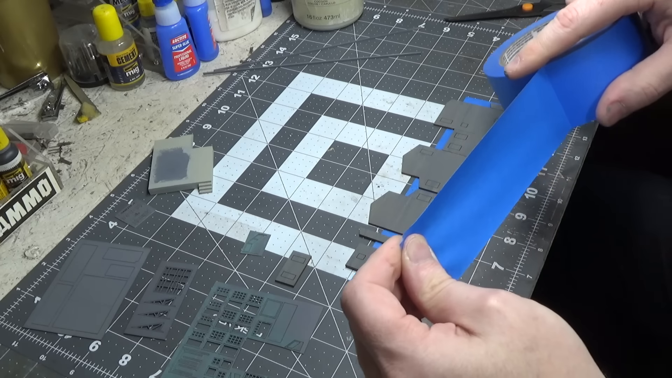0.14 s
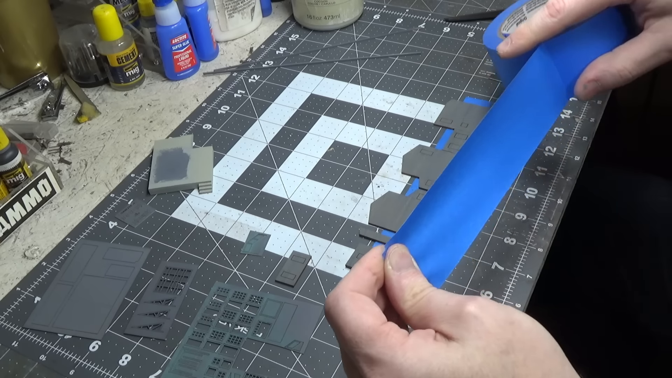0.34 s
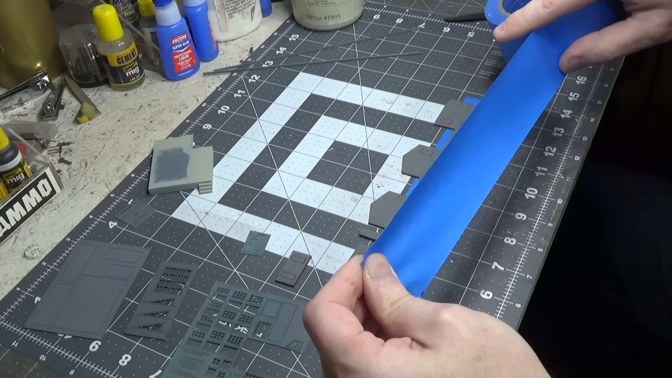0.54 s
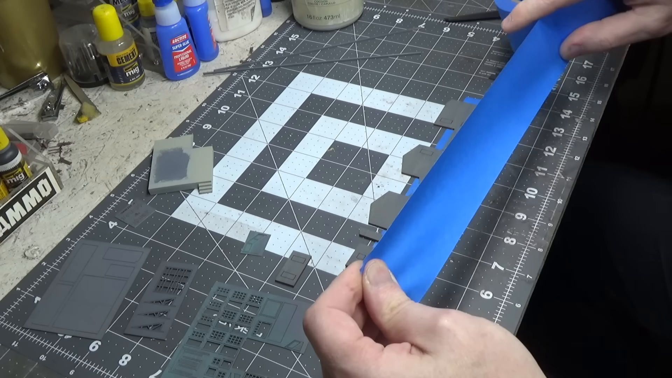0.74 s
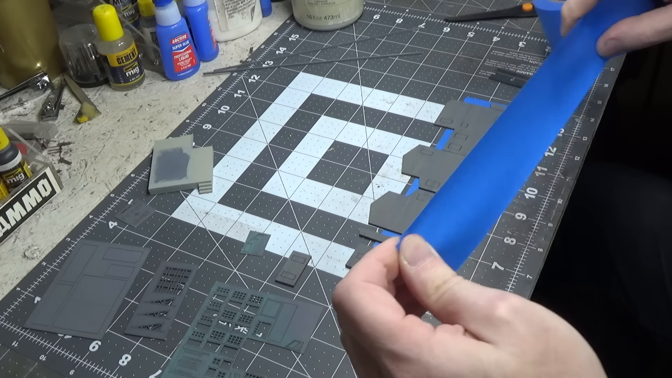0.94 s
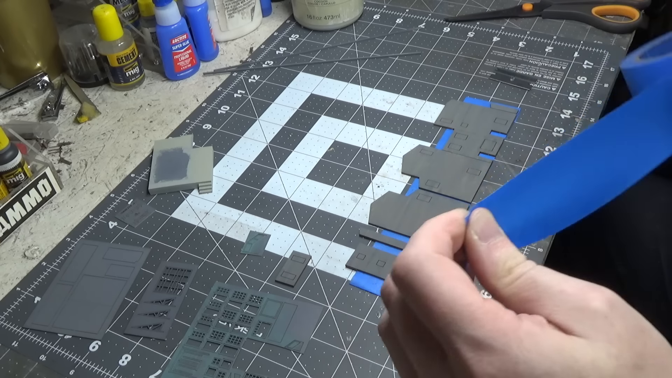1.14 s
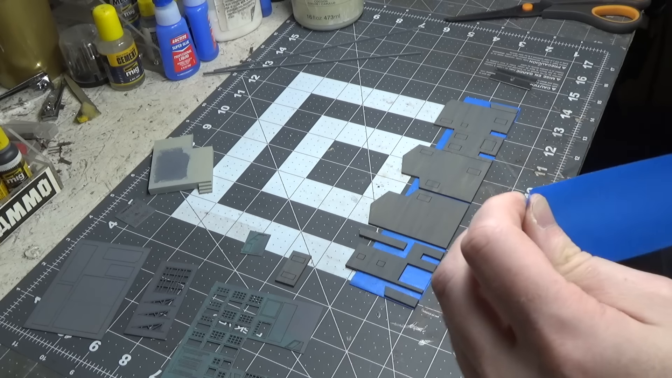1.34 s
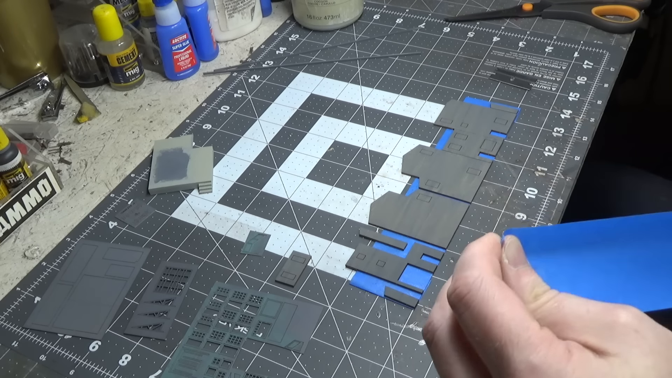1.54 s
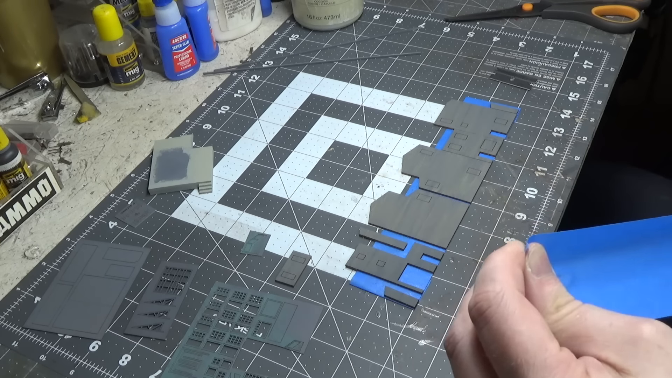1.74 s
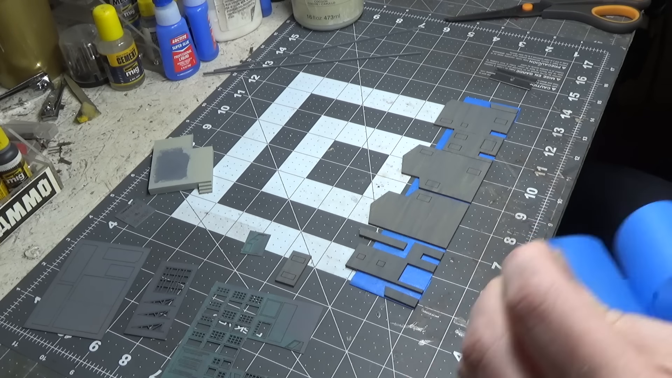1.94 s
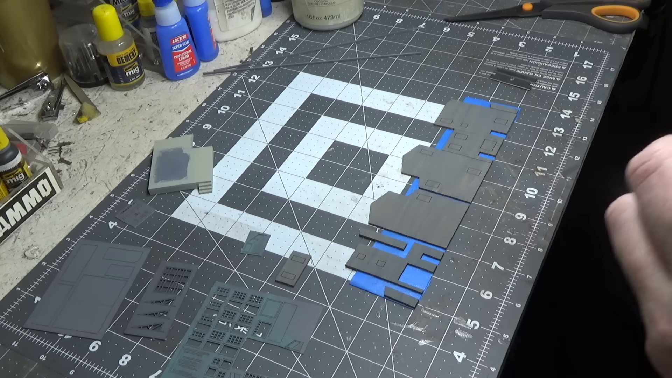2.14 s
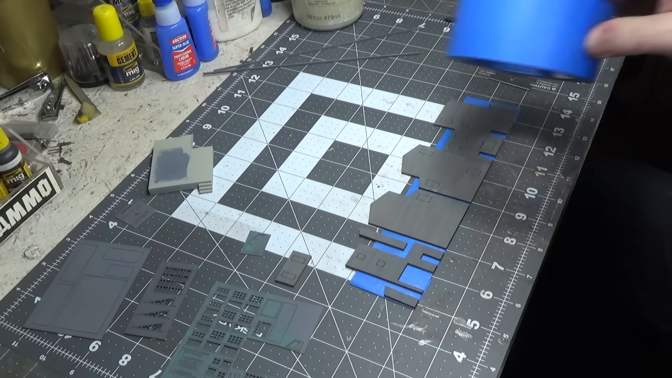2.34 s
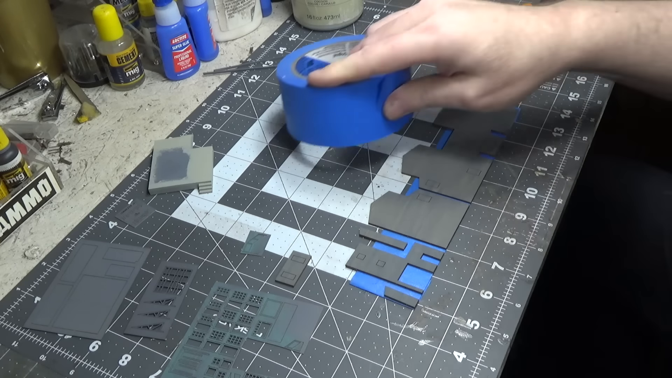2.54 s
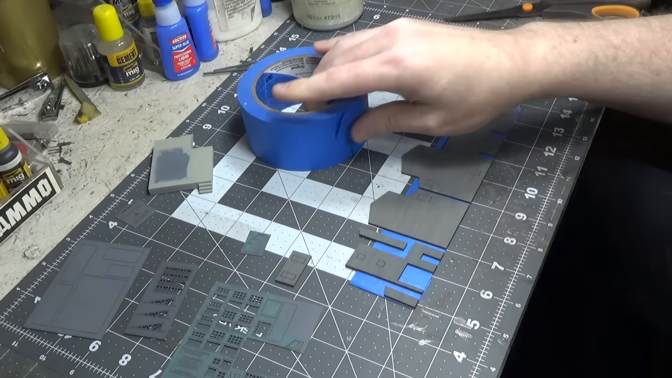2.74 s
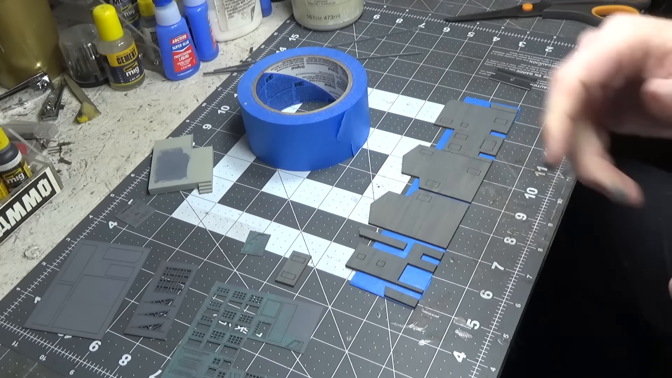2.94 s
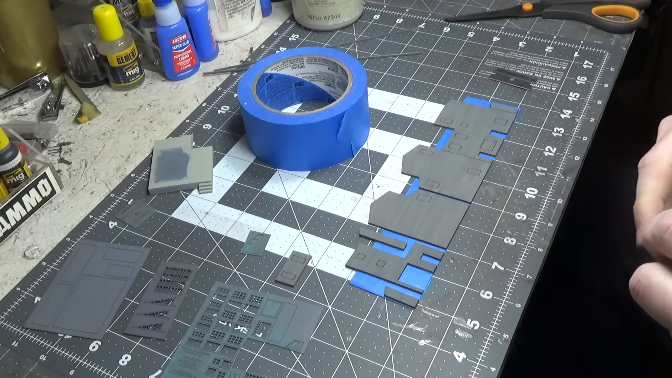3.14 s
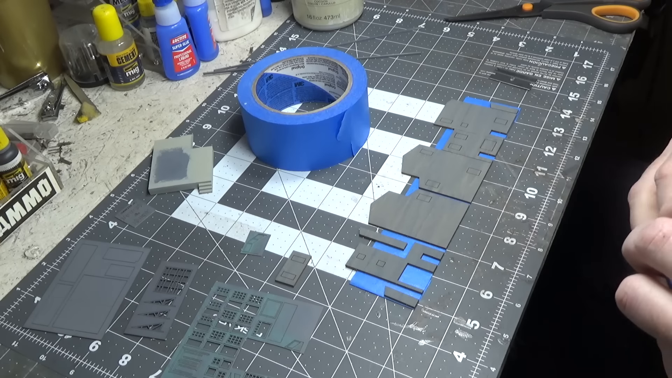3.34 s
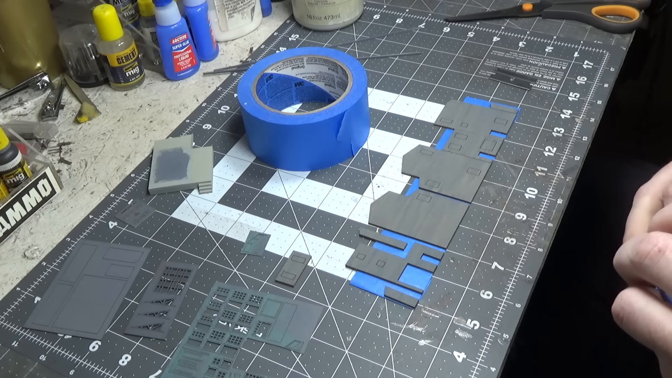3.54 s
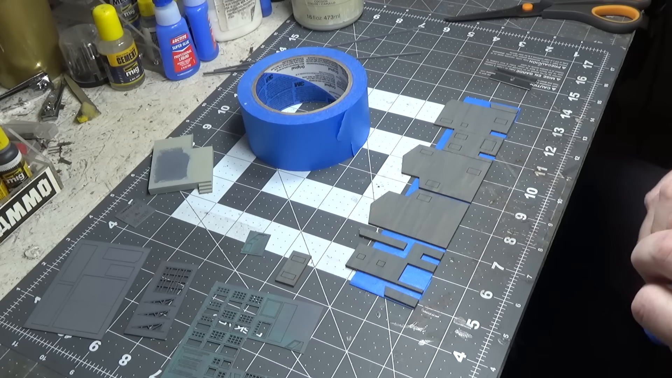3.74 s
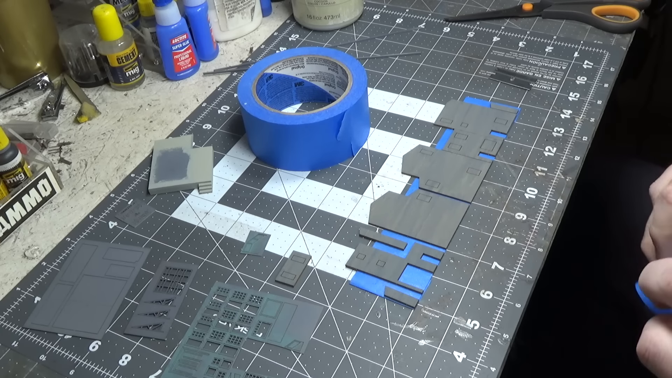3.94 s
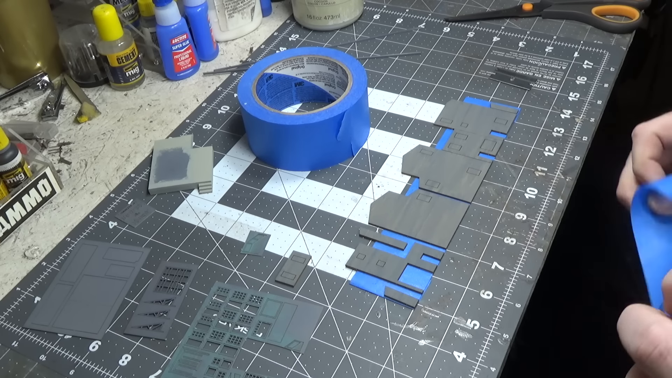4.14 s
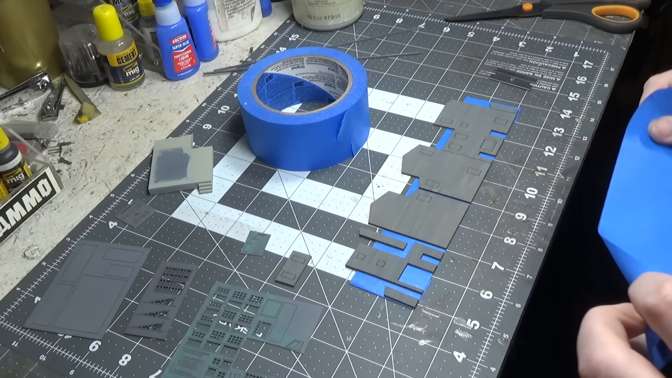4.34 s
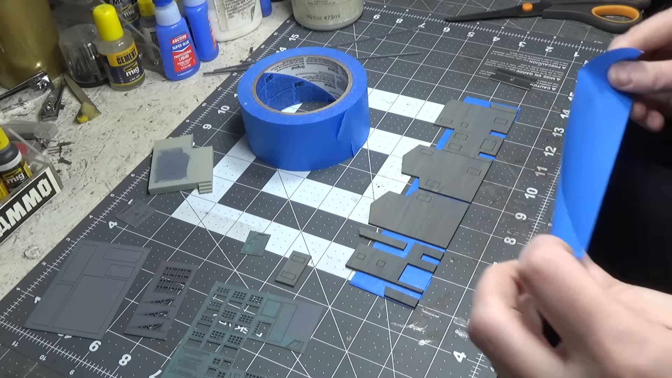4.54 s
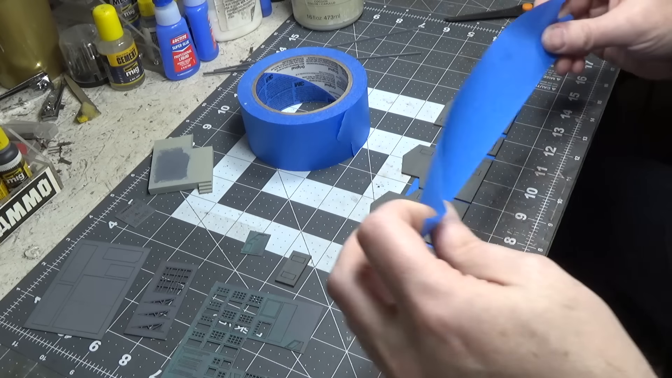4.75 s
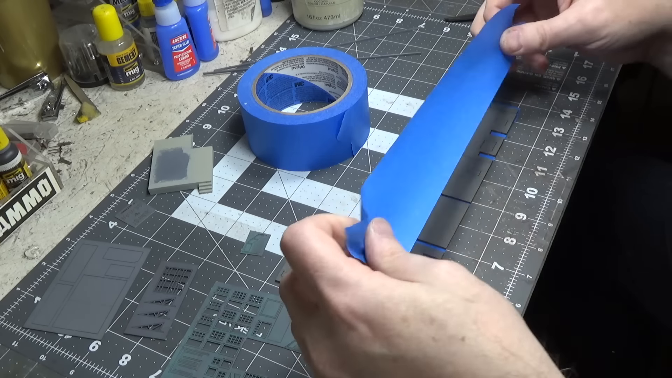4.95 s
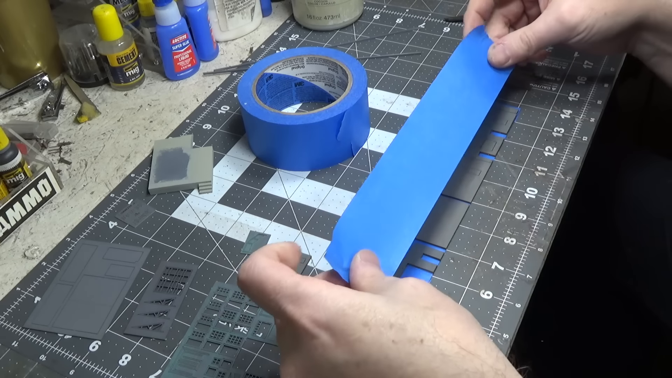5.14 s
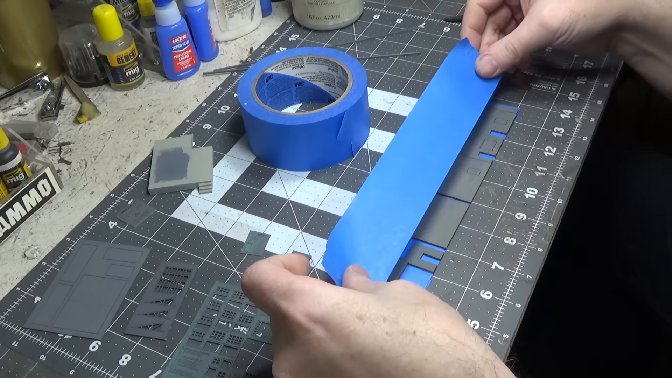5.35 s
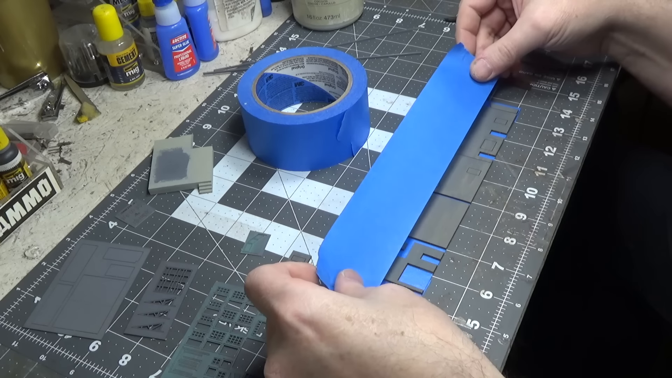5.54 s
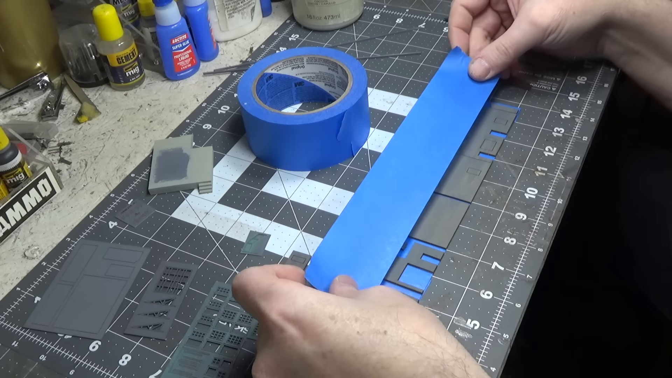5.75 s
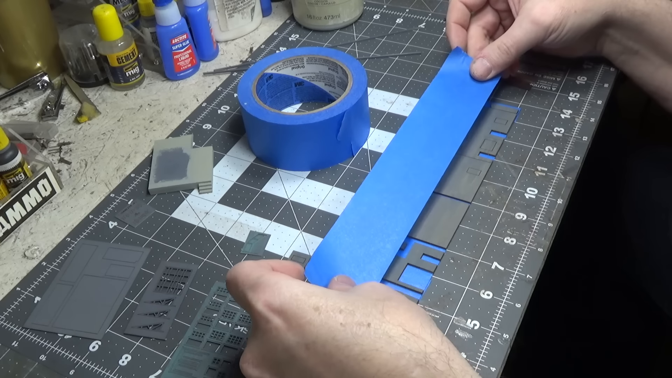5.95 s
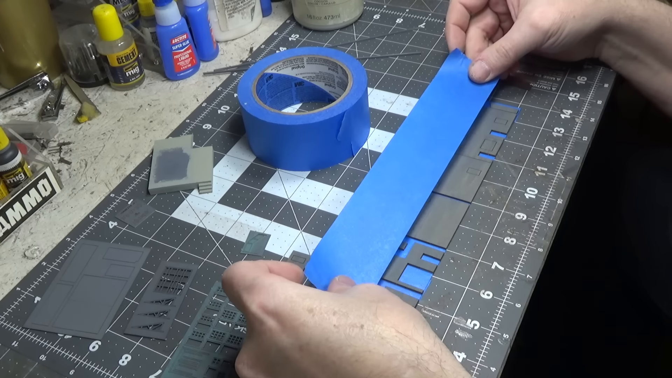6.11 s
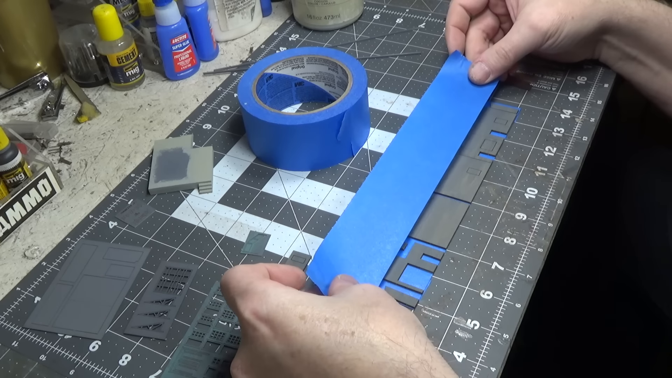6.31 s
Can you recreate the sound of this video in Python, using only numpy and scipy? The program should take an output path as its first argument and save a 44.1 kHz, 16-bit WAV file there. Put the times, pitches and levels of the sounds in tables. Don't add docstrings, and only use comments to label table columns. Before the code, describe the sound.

Close-up of masking tape being unrolled and ripped loose, the roll knocked onto a desk, and the strip crinkled and smoothed by fingers in a quiet room.

```python
import sys
import numpy as np
from scipy import signal
from scipy.fft import rfft, irfft
from scipy.io import wavfile
from scipy.ndimage import uniform_filter1d, map_coordinates

SR = 44100
rng = np.random.default_rng(int(sys.argv[2]) if len(sys.argv) > 2 else 0)


def int16_out(signal):
    q = np.round(np.clip(np.atleast_2d(signal).T, -1, 1) * 32767)
    wavfile.write(sys.argv[1], SR, q.astype(np.int16))


def boost(x):
    u = np.asarray(x, float) / 20
    return 10 ** u


N = 281269
T = np.arange(N) / SR


def unit(x):
    return x / np.sqrt(np.mean(x ** 2) + 1e-20)


def noise():
    return rng.standard_normal(N)


def add_at(out, s, sound):
    out[round(s * SR):][:len(sound)] += sound


def along(points, hz):
    f, v = np.transpose(points)
    return np.interp(np.log(hz + 1), np.log(f + 1), v)


def curves(rows):
    s, first, *rest = np.transpose(rows)
    return [np.interp(T, s, first, -200, -200)] + [np.interp(T, s, column) for column in rest]


def wobble(rate):
    return map_coordinates(rng.standard_normal(int(N * rate / SR) + 4), [T * rate])


def colour(x, gain):
    size = 8192
    g = gain(np.fft.rfftfreq(size, 1 / SR)) + 1e-5
    cepstrum = irfft(np.log(unit(g)))
    cepstrum[1:size // 2] *= 2
    cepstrum[size // 2 + 1:] = 0
    return signal.fftconvolve(x, irfft(np.exp(rfft(cepstrum))))[:N]


def tint(x, points):
    return colour(x, lambda hz: boost(along(points, hz)))


def gliding(force, hz, width_hz):
    turn = np.exp(2j * np.pi * np.cumsum(hz) / SR)
    pole = np.exp(-1.5 * np.pi * width_hz / SR)
    smooth = signal.lfilter([1], [1, -2 * pole, pole ** 2], force / turn)
    return unit((turn * smooth).real)


def grit(spike_db, share):
    clicks = (rng.random(N) < share) * boost(spike_db * rng.random(N))
    return unit(noise() * (1 + clicks))


def patchy(x, depth_db):
    z = signal.stft(x, nperseg=256)[2]
    field = uniform_filter1d(rng.standard_normal(z.shape), size=7, axis=0)
    field = uniform_filter1d(field, size=14, axis=1)
    return unit(signal.istft(z * boost(depth_db * unit(field)), nperseg=256)[1][:N])


# frequency in Hz, level in dB.
MICROPHONE_COLOUR = [(530, -54.5), (900, -15.5), (1020, -11), (1150, -9.5), (1220, -8.5), (2020, -5), (2300, -6),
                     (3000, -1.5), (3910, -11), (5410, -4.5), (6970, -8), (8980, -6), (11100, -13.5),
                     (14900, -21.5), (16000, -27)]
# frequency in Hz, level in dB.
KNOCK_COLOUR = [(80, -26), (200, -2.5), (450, -1), (900, 0), (1600, -13.5), (4000, -41)]


def paper(dull, sharp, knock):
    split_hz = 3900
    upper = lambda hz: 1 / (1 + (split_hz / (hz + 1)) ** 12)
    low = colour(dull, lambda hz: boost(along(MICROPHONE_COLOUR, hz)) * np.sqrt(1 - upper(hz)))
    high = colour(sharp, lambda hz: boost(along(MICROPHONE_COLOUR, hz)) * np.sqrt(upper(hz)))
    return low + high + tint(knock, KNOCK_COLOUR)


def bursts(rows):
    force = np.zeros((3, N + SR))
    t = np.arange(SR // 4) / SR
    for s, db, knock_db, sharp_db, t60, rise in rows:
        life = max(t60, .003) * np.array([[1], [.7], [1.3]])
        swell = np.minimum(t / max(rise, 1e-4), 1)
        shape = swell * boost(-60 * np.maximum(t - rise, 0) / life)
        size = boost(np.array([[db], [db + sharp_db], [db + knock_db]]))
        hiss = rng.standard_normal((3, len(t)))
        if rise == 0:
            hiss[:2] *= np.clip(t60 / .018, .2, 1)
            hiss[:2, 0] = 6.2
        muffled = np.clip(-sharp_db / 10, 0, 1)
        smooth = uniform_filter1d(uniform_filter1d(hiss[1], size=5), size=3)
        hiss[1] += muffled * (3.6 * smooth - hiss[1])
        force[:, round(s * SR):][:, :len(t)] += size * shape * hiss
    return paper(*force[:, :N])


# time in seconds, pull in dB, the free strip's lowest
# pitch in Hz, overtone in Hz.
PEELING = [
    (0.0, -42.5, 230.6, 760),
    (0.112, -39.5, 238.3, 790),
    (0.19, -43, 238.3, 790),
    (0.266, -44.5, 202.3, 846),
    (0.385, -43, 191.6, 795),
    (0.46, -43.5, 171.3, 740),
    (0.55, -43.5, 149, 633),
    (0.662, -46.5, 121.1, 591),
    (0.82, -51.5, 116.4, 580),
    (0.93, -73.5, 98.3, 874),
]


def peel():
    short_hz = 240
    hiss_db, drum_hz, over_hz = curves(PEELING)
    sunk = np.log2(short_hz / drum_hz)
    short = np.clip(drum_hz / short_hz, .1, 1) ** 2
    eased_db = 10 * np.exp(-((T - 0.83) / 0.12) ** 2)
    drum_db = hiss_db + 2.5 - 6 * sunk + eased_db
    over_db = hiss_db + 6 - 18 * sunk ** 4
    bright_db = -8 + 8.5 * sunk
    slips = boost(1.33 * wobble(220) + 0.63 * wobble(27.0))
    shaken = lambda: slips * noise()
    hiss = boost(hiss_db) * patchy(slips * grit(12, .004), depth_db=2)

    swing = np.sin(2 * np.pi * np.cumsum(drum_hz * (1 + 0.05 * short * wobble(45.4))) / SR)
    drum = boost(1.5) * swing * boost((0.5 + 2.6 * short) * wobble(30.4))
    drum = drum + boost(-1.0) * short * gliding(shaken(), 1.12 * drum_hz, width_hz=65)
    second = boost(-9.5 + 2.2 * wobble(24.6)) * gliding(shaken(), 2.0 * drum_hz, width_hz=86)
    under = boost(-0.5) * short * gliding(shaken(), 0.754 * drum_hz, width_hz=39)

    longer = np.minimum(sunk, .7)
    fine = noise() * boost(hiss_db - 29 + 32 * longer)
    fizz = colour(fine, lambda hz: np.exp(-((hz - 12500) / 3500) ** 2))
    body_force = shaken() * boost(hiss_db - 6.5 + 6.5 * longer)
    body = colour(body_force, lambda hz: np.exp(-np.log(hz / 1300 + 1e-9) ** 2 / 0.53))

    port_db = hiss_db - 5.5 - 10 * sunk + 2.5 * wobble(140) + 3 * swing
    port = boost(port_db) * gliding(shaken(), np.full(N, 3120.), width_hz=480)
    over = gliding(shaken(), over_hz, width_hz=120)
    over = over + boost(-4.0) * gliding(shaken(), 1.205 * over_hz, width_hz=83)
    over = boost(over_db - 5.0 + 3.7 * wobble(44.5)) * over
    rustle = paper(hiss, hiss * boost(bright_db), hiss * boost(-2.5))
    return rustle + boost(drum_db) * (drum + second + under) + over + fizz + body + port


# time in seconds, peak in dB, sharpness in dB,
# time to die away by 60 dB in seconds, rise in seconds.
TEAR_JERKS = [(1.788, -48.5, -1, 0.062, 0.0037), (1.804, -40.5, -0.5, 0.031, .003),
              (1.8140, -32, -7, 0.05, 0.0014), (1.8172, -11.5, -1.5, 0.057, 0.0013),
              (1.8222, -17, 0.5, 0.06, 0.0011), (1.8290, -13, 4, 0.031, 0.0035),
              (1.8335, -7.5, 0, 0.011, 0.0015), (1.8370, -15.5, -2.5, 0.036, .002),
              (1.8514, -9, 8, 0.027, 0.00051), (1.8535, -8.5, 2, 0.007, 0.0027),
              (1.858, -20.5, -1.5, 0.021, 0.0025), (1.8640, -18, -1.5, 0.0082, .002),
              (1.870, -31, -0.5, 0.12, .003)]
# time in seconds, peak in dB,
# sharpness in dB, time to die away by 60 dB in seconds, rise in seconds.
UNSTICKINGS = [(1.252, -56.5, 5, 0.03, 0.015), (1.425, -51.5, -7, 0.031, 0.015),
               (2.14, -41.5, 8, 0.014, 0.015), (3.22, -45.5, 1.5, 0.086, 0.0066),
               (3.33, -52.5, -7, 0.097, 0.013), (3.528, -42.5, -2, 0.12, 0.026),
               (3.745, -43, -1.5, 0.073, 0.012), (3.758, -47, 3.5, 0.057, .014),
               (3.806, -49, 3, 0.038, 0.004), (4.100, -31, 4.5, 0.077, 0.0037),
               (4.103, -36.5, -5, 0.036, 0.0016), (4.123, -31, -2, 0.043, 0.0064),
               (4.406, -42, 8, 0.056, 0.0072), (4.594, -52, 11, 0.027, 0.019),
               (4.814, -32, -2.5, 0.084, 0.0021), (5.080, -40.5, 4, 0.058, 0.013),
               (5.14, -43, -5, 0.058, 0.012), (5.553, -53.5, -4, 0.069, 0.02)]


def rips():
    with_knock = lambda rows, knock_db: [(s, db, knock_db, *rest) for s, db, *rest in rows]
    return bursts(with_knock(TEAR_JERKS, -7) + with_knock(UNSTICKINGS, -9.5))


# time in seconds, level in dB, pitch in Hz, time
# to die away by 60 dB in seconds.
TORN_PARTS = [(1.8189, -13, 1900, .012), (1.8225, -19.5, 5200, .02), (1.83, -11, 135.3, 0.079),
              (1.8315, -7.5, 8400, 0.012), (1.833, -11, 5200, 0.025), (1.8355, -12, 5560, 0.021),
              (1.8665, -21.5, 7000, .015), (1.862, -20, 8100, .015), (1.8663, -19, 3800, 0.0402),
              (1.8371, -17.5, 3260, 0.039), (1.838, -19, 607, .05), (1.835, -15.5, 414.6, .05),
              (1.828, -24, 42, .2), (1.852, -9, 8600, .014), (1.8522, -8.5, 9900, 0.013),
              (1.8525, -11, 5600, 0.01), (1.855, -12, 2490, 0.019), (1.855, -15.5, 5400, .012)]
# time in seconds, level in dB, pitch in
# Hz, time to die away by 60 dB in seconds.
KNOCKED_PARTS = [(1.627, -50, 5200, .03), (1.618, -34, 430, 0.059), (1.618, -34.5, 240, 0.054),
                 (2.640, -26, 100.6, 0.066), (2.640, -37.5, 295, 0.11), (2.708, -44, 530, .08),
                 (2.6395, -35.5, 694, 0.038), (2.640, -25, 2340, 0.016), (2.640, -28, 3200, 0.018),
                 (2.778, -21.5, 419, .08), (2.779, -29, 508, 0.15), (2.777, -30.5, 1050, 0.052),
                 (2.778, -25, 3100, 0.033), (2.779, -20, 2170, .03), (2.7865, -22.5, 3180, .03),
                 (5.4649, -15, 2930, .012), (5.4715, -25, 3390, 0.031)]


def freed():
    out, t = np.zeros(N + SR), np.arange(SR // 5) / SR
    for s, db, hz, t60 in TORN_PARTS + KNOCKED_PARTS:
        onset = 1 - np.exp(-t / 0.0003)
        add_at(out, s, boost(db - 60 * t / t60) * np.sin(2 * np.pi * hz * t) * onset)
    return out[:N]


def ticks(size_db, spread_db):
    pops = (rng.random(N) < 30 / SR) * boost(size_db + spread_db * noise())
    return noise() * signal.lfilter([1], [1, -boost(-60 / (.006 * SR))], pops)


# start in seconds,
# length in seconds, grip in dB, swell over the stroke in dB, sharpness in dB.
FINGER_STROKES = [(0.933, 0.099, -66, 10.5, -0.5), (1.036, 0.13, -61.5, 3, -2), (1.104, .018, -56, 6, -3),
                  (1.119, 0.075, -48, -7.5, -2), (1.204, .16, -55.5, -7.5, -9), (1.363, 0.067, -60.5, -3, -6),
                  (1.445, 0.098, -54, -2, -4.5), (1.56, 0.043, -73, -10, 0), (1.879, 0.11, -49.5, -2.5, -6),
                  (2.02, 0.065, -58, 0, -0.5), (2.084, 0.067, -46.5, 1.5, 3), (2.168, 0.03, -49.5, -1, -5),
                  (2.201, 0.07, -48.5, 0.5, 2.5), (2.286, 0.066, -59, 9.5, -5), (2.389, 0.18, -57, -2.5, -4),
                  (2.646, 0.03, -48, -8, -19), (2.691, 0.019, -45, 1, -10), (2.732, 0.047, -64, -5, -14),
                  (2.748, 0.057, -61.5, 9, -5.5),
                  (3.188, 0.037, -51.5, -8.5, -1.5), (3.242, 0.052, -62.5, 12, -2),
                  (3.299, 0.099, -52, 3, -7.5), (3.43, 0.088, -52.5, 0.5, -5), (3.568, 0.18, -71, 13, -5),
                  (3.746, 0.14, -52.5, -2, -3), (3.909, 0.27, -55, 11, -3.5),
                  (4.149, 0.046, -48.5, 5, -3.5), (4.193, 0.083, -44.5, -3.5, -1.5),
                  (4.281, 0.12, -49, 3, 1.5), (4.398, 0.076, -45, -3, 0), (4.493, 0.13, -68, 6.5, 6),
                  (4.639, 0.055, -45.5, -13, -10), (4.686, 0.064, -58.5, 3, -6),
                  (4.746, 0.079, -53.5, 8, -5.5), (4.846, 0.094, -54.5, 2.5, -3),
                  (4.994, 0.23, -50.5, -11, -6.5), (5.332, 0.12, -73, 9, -1.5),
                  (5.472, 0.36, -64, -3, -7.5), (5.776, 0.11, -56.5, -12, -10.5),
                  (5.9, 0.36, -73.5, 1.5, -12)]
# time in seconds, ring over the grip in dB, pitch in Hz.
SINGING_PATCH = [(0.9, -14, 3168), (2.0, 2.5, 3110), (2.3, -8, 2663), (3.2, -17, 2115), (3.35, -3, 3110),
                 (3.47, -9, 3110), (3.54, -4.5, 2227), (3.82, -1, 2286), (3.9, -8.5, 3020),
                 (4.15, -5.5, 3127), (4.5, -4.5, 3085), (5.0, -10.5, 3053), (6.4, -3.5, 3207)]


def strokes():
    dull, sharp = np.zeros(N), np.zeros(N)
    for s, length, db, swell_db, sharp_db in FINGER_STROKES:
        force = boost(curves([(s, db), (s + abs(length), db + swell_db)])[0])
        dull += force
        sharp += boost(sharp_db) * force
    release_s = 0.018
    keep = np.exp(-1 / (release_s * SR))
    fade = lambda level: signal.lfilter([1 - keep], [1, -keep], level)
    soft = lambda level: np.maximum(uniform_filter1d(level, size=200), fade(level))
    dull, sharp = soft(dull), soft(sharp)

    grip = boost(1.5 * wobble(70) + 1.2 * wobble(25))
    dull_force = dull * patchy(grip * grit(14, .004), depth_db=2.4)
    sharp_force = sharp * patchy(grip * boost(1.5 * wobble(90)) * grit(14, .004), depth_db=2.2)
    sharp_force = sharp_force + np.minimum(sharp, boost(-61.5)) * ticks(size_db=10.0, spread_db=3.5)

    ring_db, ring_hz = curves(SINGING_PATCH)
    ring = dull * boost(ring_db) * gliding(grip * grit(12.8, 0.0035), ring_hz, width_hz=500)
    high_hz = 9000 + 350 * wobble(7.4)
    ring = ring + sharp * boost(-11.5) * gliding(grip * grit(12, .004), high_hz, width_hz=900)
    return paper(dull_force * boost(-3.0), sharp_force, dull_force * boost(-17.5)) + ring


# time in seconds, peak in dB, sharpness in dB, ring in Hz.
TAUT_SNAPS = [(.9747, -38, -8, 2820), (.9784, -40, 3, 3420), (1.2468, -37.5, 11, 1980),
              (1.263, -28, -17, 1980), (1.3657, -40.5, 5.5, 3470), (1.4408, -20, -2.5, 3330),
              (1.447, -27, -4, 3240), (2.0098, -22.5, 7.5, 2900), (2.155, -16.5, -11, 2980),
              (2.3277, -30, 1.5, 2260), (2.3892, -55, 2, 3100), (2.5065, -37, -9.5, 1780),
              (2.5276, -46, 12.5, 3187), (3.274, -27, -2, 2207), (3.3447, -26, 7, 3270),
              (3.3555, -22, 5, 2350), (3.463, -29, -13, 3200), (3.49, -30.5, -17, 2950),
              (3.5484, -18.5, -1, 2230), (3.8786, -31.5, 6.5, 2860), (3.9245, -40, 6.5, 2870),
              (4.1404, -18.5, -17, 3040), (4.4468, -28, -11, 2720), (4.812, -11.5, 0.5, 2700),
              (4.8605, -33, 3, 3300), (4.9585, -19, -4, 2940), (5.0889, -19, 2, 3370),
              (5.1633, -17, -2.5, 3030), (5.4652, -14.5, 0.5, 2980), (5.4722, -41, -20, 3380),
              (5.7823, -49.5, -13, 3260)]
# time in #
# seconds, peak in dB, sharpness in dB, ring in Hz.
SLACK_BUCKLES = [(.9887, -41, 8, 3380), (1.1218, -43, 21, 3190), (1.5396, -34, -12, 3600),
                 (1.472, -40.5, -10, 1910), (1.501, -52, 0, 1500), (1.6177, -24, -14, 3430),
                 (1.6205, -27.5, -10, 3370), (1.545, -35, -16, 1380), (1.928, -24, -18, 3020),
                 (2.0068, -25, -4, 3100), (2.0199, -41, 0, 2168), (2.5556, -48, 18, 830),
                 (2.639, -24.5, -25, 2680), (2.885, -62, 19, 3000), (2.909, -52, 8, 2990),
                 (2.954, -65.5, 21.5, 2980), (3.2096, -39, 9, 1826), (3.3714, -39.5, 13.5, 3020),
                 (3.4348, -49, 12, 3150), (3.5313, -27, -5, 1250), (3.5394, -21, -17, 2110),
                 (3.6516, -38.5, -1, 2190), (3.7816, -28.5, 4, 2320), (3.8016, -28, 2.5, 2430),
                 (3.8397, -41, 13, 2330), (3.9589, -35.5, 7, 1270), (4.6159, -21, 11, 2610),
                 (4.6625, -20, 5.5, 1016), (4.6677, -19, -22, 3400), (4.815, -25, -15, 1350),
                 (4.9757, -19, -16, 2300), (5.0645, -41, 14, 3000), (5.1824, -30, -3, 1660)]
# time in seconds, peak in dB, knock in dB.
FINGER_TAPS = [(1.0244, -45, 0), (1.048, -32.5, -0.5), (1.3873, -37.5, 5), (1.6414, -33.5, 3),
               (1.6676, -46, 15), (1.9633, -24, -5), (2.2912, -35.5, 1), (2.3513, -43, 11.5),
               (3.6, -52, 14.5), (3.9886, -42, 5.5), (4.7746, -45, 12), (1.619, -32, 3.5)]


def creases():
    def kind(rows, knock_db, t60):
        return [(s, db, knock_db - 0.35 * (db + 30), sharp_db, t60, hz) for s, db, sharp_db, hz in rows]

    taps = [(s, db, knock_db, -17, .04, 860) for s, db, knock_db in FINGER_TAPS]
    return kind(TAUT_SNAPS, -14, 0.033) + kind(SLACK_BUCKLES, -1.5, 0.039) + taps


def snaps():
    ring, t = np.zeros(N + SR), np.arange(SR // 20) / SR
    lead_in, crack, rattle = [], [], []
    for s, db, knock_db, sharp_db, t60, hz in creases():
        add_at(ring, s, boost(db - 9.5 - 60 * t / (0.64 * t60)) * np.sin(2 * np.pi * hz * t))
        lead_in.append((s - .012, min(db - 33, -54), knock_db, sharp_db, .004, .012))
        crack.append((s, db - 9.5, knock_db, sharp_db, .006, 0))
        rattle.append((s, db - 14.5, knock_db + 0.5, sharp_db, t60, 0))
    return ring[:N] + bursts(lead_in + crack + rattle)


# time in seconds, peak in dB, pitch in Hz.
AIR_KICKS = [(.98, -39, 7600), (.9898, -36, 5200), (1.0504, -35, 1400), (1.122, -25, 7000),
             (1.2473, -35, 6500), (1.4409, -21, 4000), (1.618, -26, 4000), (1.9283, -24, 1900),
             (1.9642, -21, 1800), (2.0081, -27, 3000), (2.01, -21, 6000), (2.1564, -22, 4000),
             (4.141, -23, 2000), (4.6628, -23, 2400), (4.8126, -16, 3000), (4.8621, -35, 4500),
             (4.9233, -38, 3400), (4.9591, -26, 3500), (5.0804, -31, 6300), (5.1637, -24, 4500),
             (5.1826, -31, 2200), (5.4658, -10, 3000)]


def kicks():
    out, t = np.zeros(N + SR), np.arange(-64, 64) / SR
    for s, db, hz in AIR_KICKS:
        u = (np.pi * hz * t) ** 2
        out[round(s * SR) - 64:][:len(t)] -= boost(db) * (1 - 2 * u) * np.exp(-u)
    return out[:N]


# time in seconds, peak in dB.
PARTING_FIBRES = [(1.3344, -48), (1.3663, -43), (1.5274, -45), (1.5944, -42), (2.389, -43), (3.2107, -28),
                  (3.2215, -24), (3.2314, -34), (3.2565, -35), (3.2814, -40), (3.3304, -22), (3.5114, -41),
                  (3.6094, -42), (3.6314, -47.5), (3.6874, -50), (3.7144, -47.5), (3.731, -34),
                  (3.8514, -32), (3.9235, -37), (4.2594, -28), (4.3414, -36), (4.3625, -25), (4.3914, -30),
                  (4.415, -24), (4.511, -45.5), (5.4044, -51.5)]


def fibres():
    return bursts([(s, db - 13, -30, 14, .005, 0) for s, db in PARTING_FIBRES])


# time in seconds, level in dB, time to die away by 60 dB in seconds.
ROLL_CONTACTS = [
    (2.639, -37.5, 0.083),
    (2.774, -36, .03),
    (2.7760, -16, 0.035),
    (2.778, -21, 0.025),
    (2.7875, -30.5, 0.058),
    (2.794, -38.5, 0.29),
]
# frequency in Hz, level in dB.
CORE_COLOUR = [(150, -50), (250, 1), (320, -5), (420, 2.5), (520, -4.5), (761, -12.5), (984, -10),
               (1600, -16.5), (1950, -13), (3050, -14), (3550, -18), (4000, -27.5), (15000, -47)]


def roll():
    shape = sum((T >= s) * boost(db - 60 * np.maximum(T - s, 0) / t60) for s, db, t60 in ROLL_CONTACTS)
    return tint(shape * noise(), CORE_COLOUR)


# time in seconds, level in dB.
DESK_PUSHES = [
    (1.617, -56),
    (1.831, -28),
    (2.641, -40.5),
    (2.7772, -24.5),
    (4.812, -53),
    (4.975, -47.5),
]
# pitch in Hz, level in dB, time to die away by 60 dB in seconds.
BOARD_MODES = [(84, 2.5, 0.25), (88.76, -19, 0.89), (110.1, 5, 0.12), (141, 3, 0.21), (176.4, 2, 0.14),
               (295, -15, 0.14), (695.4, -13.5, 0.074)]
# start in seconds, pitch in Hz, level in dB,
# time to die away by 60 dB in seconds.
LEG_SWAY = [
    (2.79, 35.8, -32.3, 2.1),
    (2.784, 42.8, -37.2, 2.7),
]


def desk():
    out, t = np.zeros(N + 2 * SR), np.arange(2 * SR) / SR
    board = sum(boost(db - 60 * t / t60) * np.sin(2 * np.pi * hz * t) for hz, db, t60 in BOARD_MODES)
    for s, db in DESK_PUSHES:
        add_at(out, s, -boost(db) * board * (1 - np.exp(-t / 0.00053)))
    for s, hz, db, t60 in LEG_SWAY:
        add_at(out, s, boost(db - 60 * t / t60) * np.sin(2 * np.pi * hz * t) * (1 - np.exp(-t / 0.013)))
    return out[:N]


# start in seconds, length in seconds, level in dB.
SLEEVE_RUBS = [
    (2.66, .1, -56),
    (5.22, .25, -62.5),
    (4.77, .03, -60),
    (4.91, .03, -62),
    (5.9, .3, -70),
]
# frequency in Hz, level in dB.
CLOTH_COLOUR = [(80, -25), (250, 0), (500, -3), (950, -4), (1150, -18), (3000, -40)]


def sleeve():
    level = sum(boost(curves([(s, db), (s + length, db)])[0]) for s, length, db in SLEEVE_RUBS)
    force = uniform_filter1d(level, size=600) * boost(1.4 * wobble(40)) * noise()
    return tint(force, CLOTH_COLOUR)


# time in seconds, peak in dB, half width in seconds.
AIR_PUFFS = [(1.0, -62, 0.18), (1.27, -59, 0.037), (1.602, -58.5, 0.31), (1.91, -51.5, 0.029),
             (2.03, -54, 0.072), (2.6, -68, 0.046), (3.6, -56, 0.14), (3.85, -63, 0.069),
             (4.13, -48.5, 0.043), (4.45, -55.5, 0.087), (4.63, -46, 0.029), (4.72, -57, .05),
             (4.84, -47, 0.059), (2.74, -47, 0.047), (5.3, -63, 0.024), (5.5, -62.5, .03),
             (4.985, -45.5, 0.032), (5.2, -63, .12)]
# frequency in Hz, level in dB.
AIR_COLOUR = [(15, -25), (35, -1), (65, -3), (120, -8.5), (300, -44)]


def flap():
    level = sum(boost(db) * np.exp(-((T - s) / wide) ** 2) for s, db, wide in AIR_PUFFS)
    return level * tint(noise(), AIR_COLOUR)


# frequency in Hz, time to die away by 60 dB in seconds.
ROOM_DECAY = [(150, 0.17), (1500, 0.081), (5000, 0.19), (14000, 0.12)]


def room(x):
    out, step = np.zeros(N + SR), SR // 3
    for start in range(0, N, step):
        hz, t, z = signal.stft(rng.standard_normal(step), SR, nperseg=256)
        decay = boost(-60 * t / along(ROOM_DECAY, hz)[:, None])
        tail = signal.istft(z * decay, SR, nperseg=256)[1]
        wet = signal.fftconvolve(x[start:start + step], tail / np.linalg.norm(tail))
        out[start + 200:][:len(wet)] += wet
    return out[:N]


# pitch in Hz, level in dB.
HUM_TONES = [(59.2, -71), (177.6, -74), (242.2, -71.5), (290.7, -75), (360.7, -73.5), (479.1, -76.5),
             (597.5, -81), (839.8, -77.5)]
# frequency in Hz, level in dB.
FLOOR_COLOUR = [(12, -32.5), (20, -4.5), (55, -1.5), (248, -4.5), (367, -11.5), (422, -13), (472, -7.5),
                (660, -14.5), (849, -12.5), (923, -14.5), (3070, -19.5), (4300, -22.5), (16000, -27.5)]


def background():
    hum = np.zeros(N)
    for hz, db in HUM_TONES:
        hum += boost(db + 1.5 + 0.58 * wobble(1.4)) * np.sin(2 * np.pi * hz * T + 0.73 * wobble(24))
    return hum + boost(-63 + 0.64 * wobble(4.1)) * tint(noise(), FLOOR_COLOUR)


def scene():
    tape = peel() + strokes() + snaps() + rips() + freed() + fibres() + sleeve() + roll() + kicks()
    return (tape + boost(-14.5) * room(tape) + desk() + flap() + background())[None]


def band_limit(x):
    return signal.sosfilt(signal.butter(12, 21850, fs=SR, output="sos"), x)


def record(dry):
    top_hz = 16000
    full = dry / (1 + np.abs(dry / 1.15) ** 6) ** (1 / 6)
    band = np.clip((top_hz - np.fft.rfftfreq(N, 1 / SR)) / 300, 0, 1)
    kept = irfft(rfft(full) * band, N)
    return band_limit(np.clip(kept, -1, 1))


dry = scene()
out = record(dry)
int16_out(out)
```